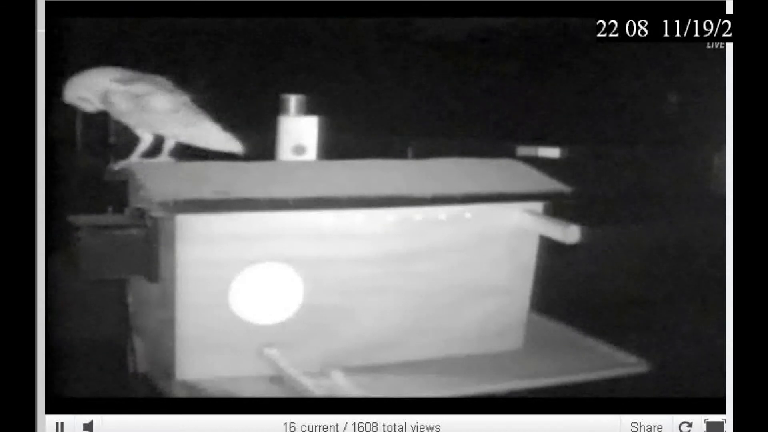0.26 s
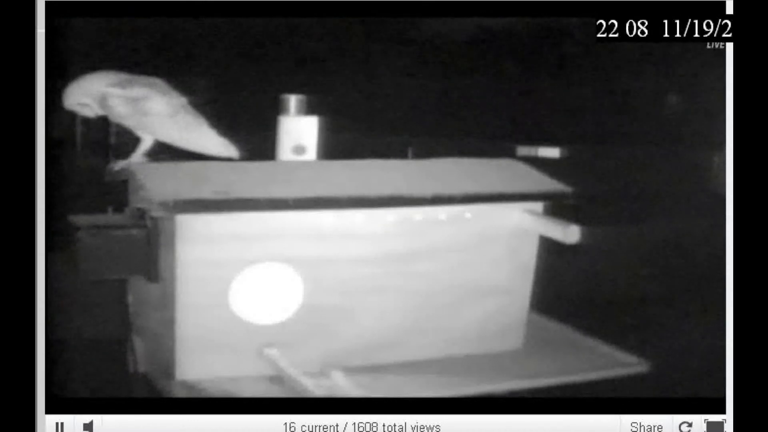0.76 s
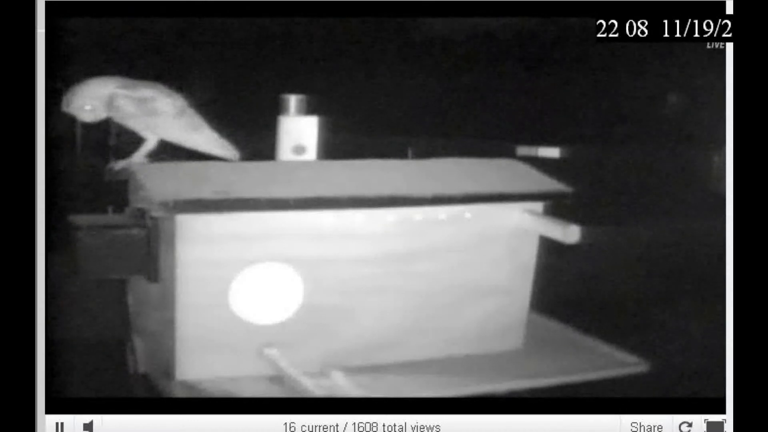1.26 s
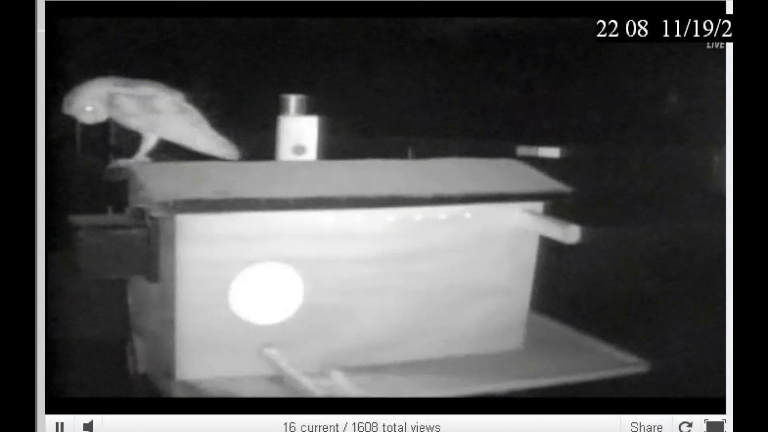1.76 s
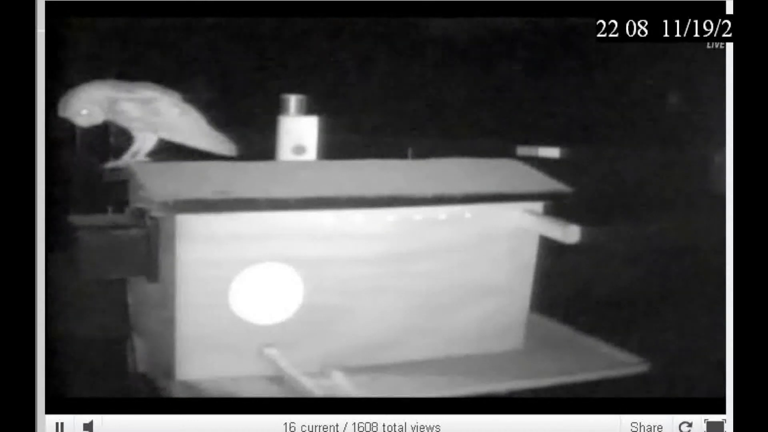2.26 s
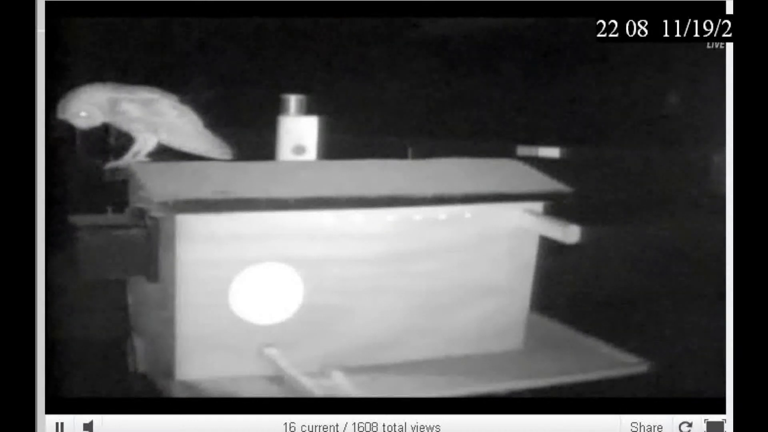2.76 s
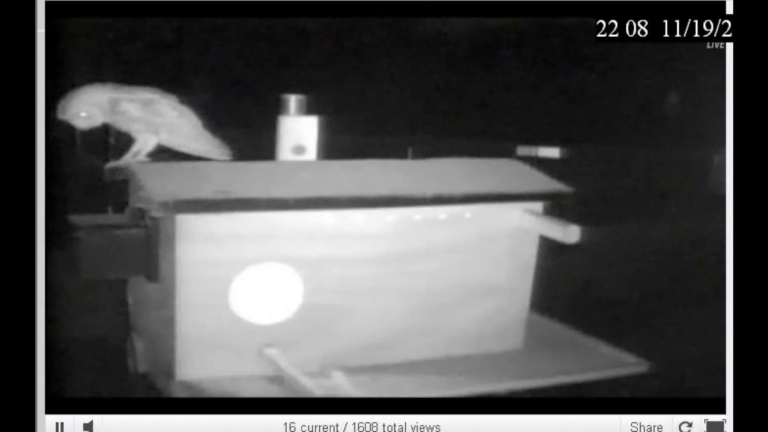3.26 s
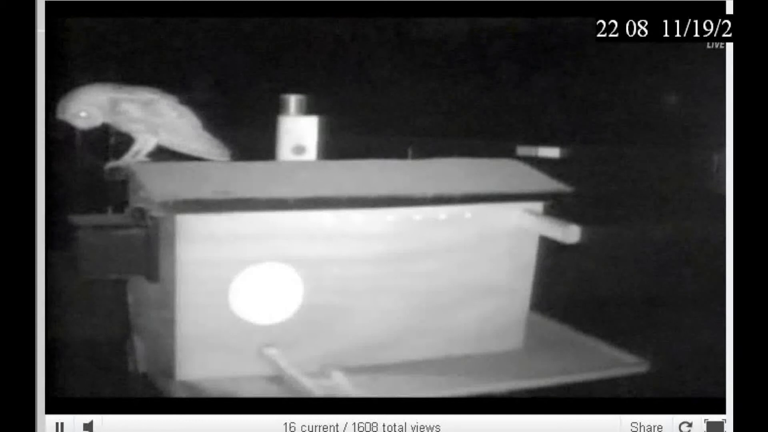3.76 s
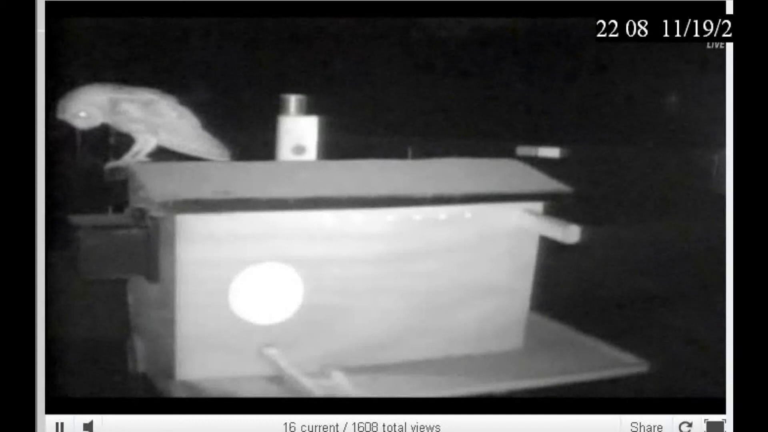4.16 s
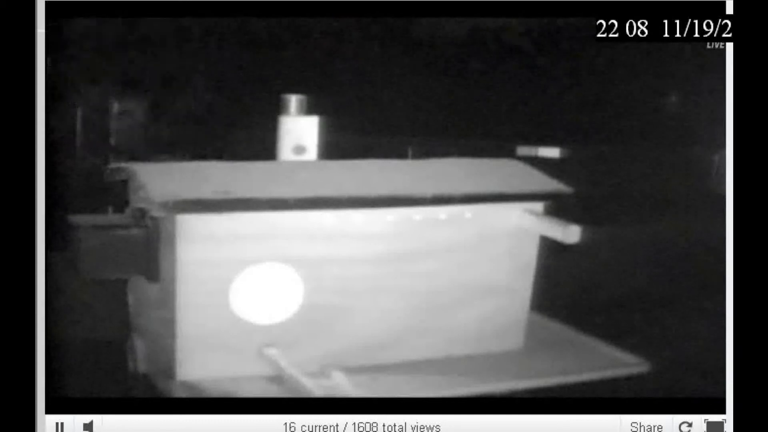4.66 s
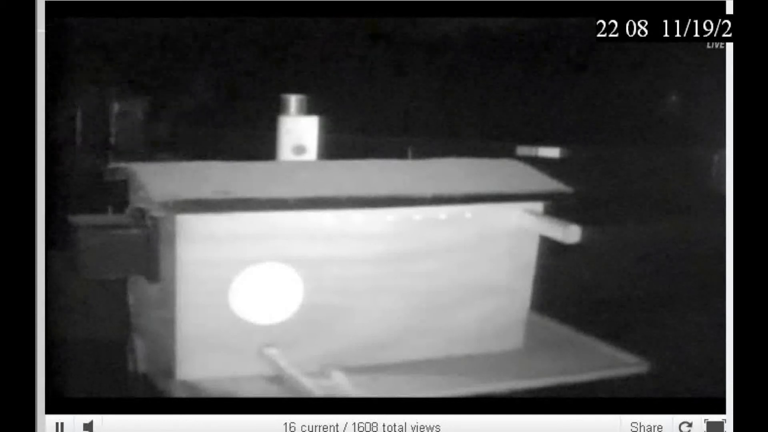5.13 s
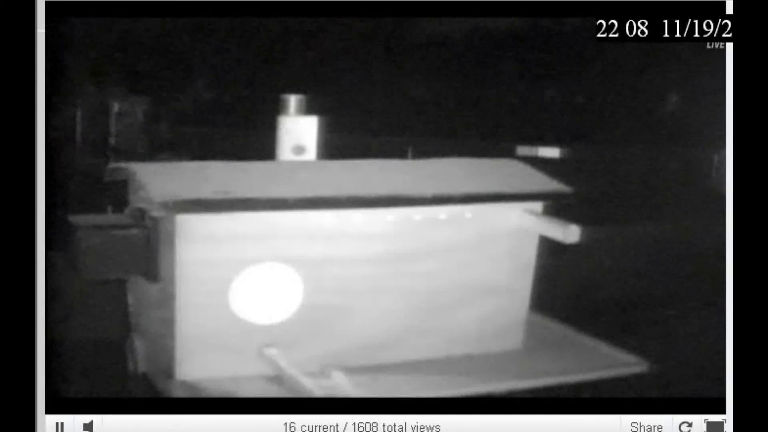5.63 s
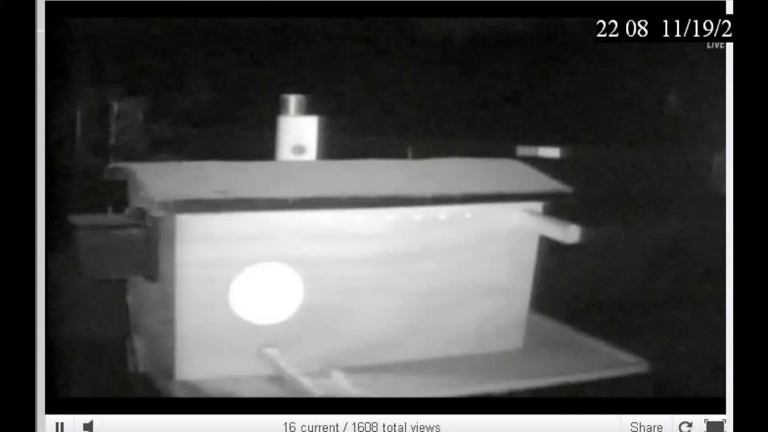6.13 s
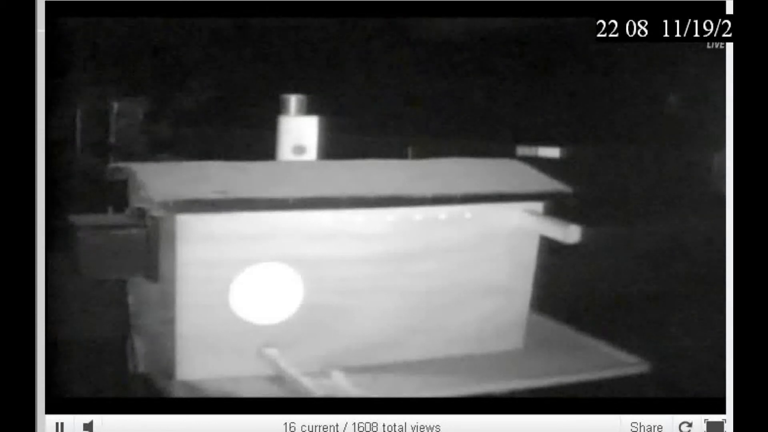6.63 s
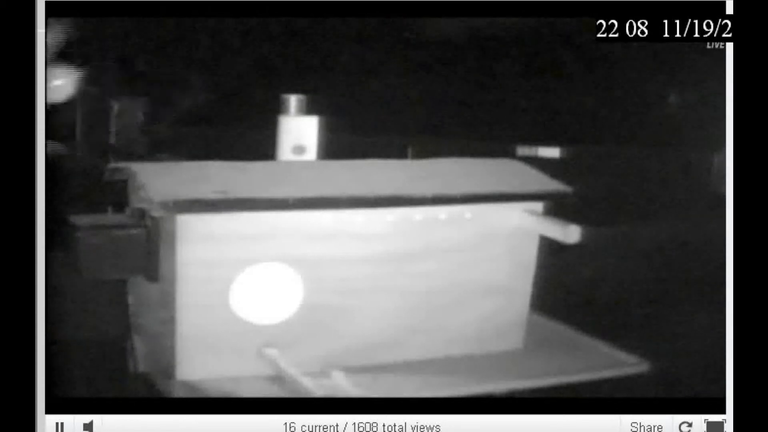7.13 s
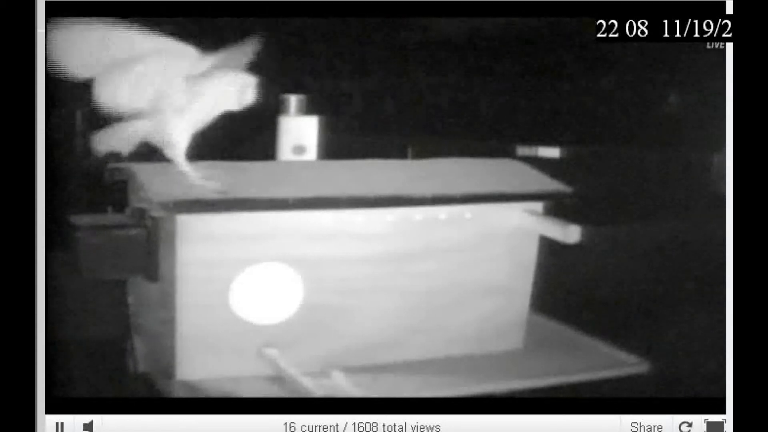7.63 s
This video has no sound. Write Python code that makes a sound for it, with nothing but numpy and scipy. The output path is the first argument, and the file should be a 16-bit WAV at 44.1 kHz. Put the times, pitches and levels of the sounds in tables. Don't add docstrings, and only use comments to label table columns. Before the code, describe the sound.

Close inside a hollow wooden nest box at night, low air rumble and faint hiss surround an owl's claws ticking, slipping and scraping on the roof overhead. Dull footfalls ring the walls. Midway, two heavy slams boom and crackle with harsh overload, followed by small rebounds. Sparse scratches continue, then one firm knock with a woody tick before the box settles into quiet rumble.

```python
import sys
import numpy as np
from scipy import signal
from scipy.io import wavfile
from scipy.ndimage import uniform_filter1d

SR = 44100
rng = np.random.default_rng(int(sys.argv[2]) if len(sys.argv) > 2 else 0)


def to_wav(sig):
    pcm = np.clip(np.atleast_2d(sig), -1, 1) * 32767
    pcm = np.round(pcm).astype(np.int16)
    wavfile.write(sys.argv[1], SR, pcm.T)


def volts_from_db(level):
    exponent = np.asarray(level, float) / 20
    return 10 ** exponent


N = 347949
TIME = np.arange(N) / SR


def unit(x):
    return x / np.sqrt(np.mean(x ** 2))


def band(x, lo_hz, hi_hz, order=2):
    return signal.sosfilt(signal.butter(order, [lo_hz, hi_hz], "band", fs=SR, output="sos"), x)


def resonate(x, peaks):
    out = 0
    for k, (hz, width, db) in enumerate(peaks):
        b, a = signal.iirpeak(hz, hz / max(width, 5.0), SR)
        out = out + (-1) ** k * volts_from_db(db) * signal.lfilter(b, a, x)
    return out


def walk(rate_hz):
    k = int(SR / rate_hz)
    steps = np.repeat(rng.standard_normal(N // k + 1), k)
    return 1.1 * uniform_filter1d(uniform_filter1d(steps, k), k)[:N]


def swell(t, rise_s):
    return np.sin(np.pi / 2 * np.clip(t / rise_s, 0, 1)) ** 2


def add(out, s, x):
    i = int(s * SR)
    out[i:i + len(x)] += x[:N - i]


def hollow(peaks):
    out = np.zeros(N)
    for hz, width, db in peaks:
        once = resonate(rng.standard_normal(N), [(hz, 1.6 * width, db)])
        twice = resonate(once, [(hz, 1.6 * width, 0)])
        out += volts_from_db(2.0 * walk(6.9)) * twice / np.sqrt(width)
    return unit(out)


# time in seconds, level in dB.
CALMING = [(0, -1.5), (1.4, 1.5), (2.1, 0.36), (3.4, 1.5), (4.1, 0.1), (4.55, -3.5), (5.84, -4.5),
           (6.66, -7), (7.89, -6.5)]
# pitch in Hz, width in Hz, level in dB.
RUMBLE_MODES = [(82, 30, -3), (121, 9.3, -2.5)]
# pitch in Hz, width in Hz, level in dB.
BOOM_MODES = [(181.5, 5.6, -4.5), (219.3, 59, 1), (330.5, 33, -13), (364, 46, -6), (502, 30, -18)]
# pitch in Hz, width in Hz, level in dB.
MIDDLE_MODES = [(742, 25, 4.5), (881, 15, 4), (1050, 30, -1), (1162, 4.9, 2.5), (1410, 40, -11.5),
                (936.6, 2500, -15.5)]
# level in dB, share of the calming (no unit), shudder after a knock in dB.
AIR_LAYERS = [
    (-56.5, 1, -26.5),
    (-52.5, 1, -34.5),
    (-67.5, 0.83, -56.5),
    (-68, .9, -70.5),
]


def night(box):
    shudder_s = 0.12
    calm_db = np.interp(TIME, *np.transpose(CALMING))
    keep = np.exp(-1 / (shudder_s * SR))
    shudder = signal.lfilter([1 - keep], [1, -keep], np.abs(box))
    rumble, boom, middle, upper = (volts_from_db(db + share * calm_db) + volts_from_db(shudder_db) * shudder
                                   for db, share, shudder_db in AIR_LAYERS)
    air = rng.standard_normal((2, N))
    out = rumble * hollow(RUMBLE_MODES) + boom * hollow(BOOM_MODES)
    out += middle * volts_from_db(2.0 * walk(4.1)) * unit(resonate(air[0], MIDDLE_MODES))
    out += upper * unit(band(air[1], 500, 1500, order=1))
    whistle = volts_from_db(-84 + 1.0 * walk(20)) * np.sin(2 * np.pi * 5858 * TIME)
    return out + whistle


# start in seconds, level in dB.
POST_LURCHES = [
    (3.432, -24),
    (3.772, -19),
]


def lurches():
    swing_s = 0.024
    out, t = np.zeros(N), TIME[:int(swing_s * SR)]
    for s, db in POST_LURCHES:
        add(out, s, volts_from_db(db) * np.sin(np.pi * t / swing_s) ** 2)
    return out


# pitch in Hz, width in Hz, level in dB.
BOARD_MODES = [(678, 26, 2.5), (870, 13, 5.5), (1140, 36, -13), (1430, 50, 5), (1940, 26, -3),
               (2205, 64, 0.5), (2730, 13, -6), (3060, 16, -12.5), (3090, 28, -8), (3700, 30, -5.5),
               (3480, 35, -11.5), (4263, 78, -11.5), (5190, 180, -9.5), (5500, 16, -13)]


def slide(out, slips, s, middle_db, low_db, high_db, length_s, bright_hz):
    t = TIME[:int(4 * max(length_s, 0.01) * SR)]
    slip = unit(slips[int(s * SR):][:len(t)])
    peaks = [(hz, width, db + 2.0 * rng.standard_normal()) for hz, width, db in BOARD_MODES]
    wood = resonate(slip, peaks) + volts_from_db(-13) * slip
    bright_db = np.interp(bright_hz, [1300, 6000], [2.5, -5])
    wood = wood + resonate(slip, [(bright_hz, 0.06 * bright_hz, bright_db)])
    part = t / t[-1]
    fade = np.exp(-(part / 0.21) ** 1.4)
    low = volts_from_db(low_db) * unit(band(wood, 320, 1400)) * fade ** 1.3
    middle = volts_from_db(middle_db - 11.5) * unit(band(wood, 850, 2700)) * fade
    high = volts_from_db(high_db) * unit(band(wood, 3300, 7000)) * fade ** 1.3 * np.clip(part / 0.11, 0, 1)
    add(out, s - 0.007, (low - middle + high) * swell(part, 0.14))


# start in seconds, middle, low and high level in dB, brightest pitch in Hz.
TALON_TICKS = [(0.8505, -53, -71, -70, 1410), (0.9867, -37.5, -75, -63, 1450),
               (1.0245, -40.5, -60, -62, 3000), (1.083, -70, -51, -70, 1430), (1.1934, -70, -62, -73, 1410),
               (1.2554, -34, -44, -50.5, 1800), (1.3693, -45, -45.5, -55, 1900),
               (1.745, -34, -50, -50, 2000), (1.8377, -17, -41.5, -32, 1445),
               (2.2625, -34.5, -39, -60, 1420), (2.592, -33, -61, -49, 2100), (2.7696, -56, -59, -65, 1660),
               (2.9024, -64, -55, -42, 5500), (3.159, -53, -62, -64, 1410),
               (3.2594, -51.5, -70, -60.5, 1410), (3.3074, -42, -50, -44, 2180),
               (3.699, -49, -43.5, -61.5, 1415), (4.114, -34.5, -45, -41.5, 1940),
               (5.3787, -42, -66.5, -51.5, 3720), (6.2906, -23.5, -39, -38, 1430)]


def ticks(slips):
    out = np.zeros(N)
    for s, middle_db, low_db, high_db, hz in TALON_TICKS:
        slide(out, slips, s, middle_db, low_db, high_db, 0.028, hz)
    return out


# start in seconds, middle and high level in dB, length in seconds,
# brightest pitch in Hz.
TALON_DRAGS = [(0.9637, -57, -54.5, 0.029, 1410), (1.491, -48, -82.5, 0.033, 2150),
               (1.5192, -30.5, -45, 0.045, 2181), (1.5444, -43, -46.5, 0.035, 2036),
               (1.755, -46, -36, 0.037, 4497), (1.8502, -41, -39.5, 0.021, 1534),
               (1.8744, -49, -48, 0.035, 1341), (1.9155, -35, -35.5, 0.031, 2950),
               (2.2504, -32.5, -44, 0.047, 1898), (2.602, -28.5, -34.5, 0.03, 2141),
               (3.0744, -56, -41, 0.043, 5530), (3.1196, -51, -62, 0.028, 4900),
               (3.946, -44.5, -49, 0.03, 5900), (4.14, -46, -51, 0.043, 3520),
               (4.17, -48, -49, 0.0405, 2880), (4.2523, -43, -66, 0.04, 1890),
               (6.07, -43, -44.5, 0.0477, 5080), (6.109, -46.5, -78, 0.039, 1820),
               (6.256, -37.5, -49.5, 0.043, 1940), (6.3086, -20.5, -43.5, 0.027, 1430)]


def drags(slips):
    out = np.zeros(N)
    for s, middle_db, high_db, length_s, hz in TALON_DRAGS:
        slide(out, slips, s, middle_db, middle_db - 11, high_db, length_s, hz)
    return out


# start in seconds, pitch in Hz, level in dB, length in seconds.
CLAW_SQUEAKS = [(0.974, 1430, -55, 0.027), (1.066, 690, -55.5, 0.028), (1.186, 690, -57, .02),
                (1.55, 1160, -45, .012), (1.264, 716.8, -53, 0.033), (1.489, 2190, -59, 0.061),
                (1.5, 5270, -72, .06), (1.757, 4370, -38, 0.015), (2.257, 663, -44.5, 0.014),
                (2.257, 2120, -54, 0.04), (2.597, 870, -47.5, 0.038), (2.603, 5180, -47, 0.021),
                (4.113, 1890, -52.5, 0.019), (4.118, 716, -52, 0.07), (4.148, 2860, -55.5, 0.046),
                (4.15, 3570, -56.5, .04), (6.061, 2820, -53, 0.047), (6.071, 1750, -55, .045),
                (6.068, 5614, -58, .02), (3.8115, 1400, -38, .004), (6.063, 3635, -54, 0.036),
                (6.065, 4750, -51.5, 0.032), (6.364, 1400, -54.5, 0.035), (6.369, 602, -52.5, .03),
                (1.548, 780, -41, .016), (3.297, 876, -51.5, 0.04), (1.74, 870, -49, .025),
                (3.463, 1480, -49, .024), (3.8105, 715, -30, 0.006), (6.381, 4000, -74, 0.03)]


def squeaks(slips):
    out = np.zeros(N)
    for s, hz, db, length_s in CLAW_SQUEAKS:
        t = TIME[:int(1.6 * length_s * SR)]
        peak = [(hz, 70 + 0.03 * hz, 0)]
        ring = unit(resonate(resonate(slips[int(s * SR):][:len(t)], peak), peak))
        add(out, s, volts_from_db(db) * ring * np.sin(np.pi * (t / t[-1]) ** 0.6))
    return out


def scrapes():
    slips = rng.standard_normal(N) * volts_from_db(2.0 * rng.exponential(size=N)) * volts_from_db(1.5 * walk(150))
    return ticks(slips) + drags(slips) + squeaks(slips)


# pitch in Hz, level in dB, share of the ring time (no unit).
WALL_MODES = [(159.4, -5.5, 1.5), (182.3, -7, 1.1), (210.7, -0.5, 1.1), (226.5, -3, .9)]
# pitch in Hz, level in dB, share of the ring time (no unit).
CAVITY_MODES = [(115.16, 2, 1.9), (126.3, -10.5, 0.61)]
# pitch in Hz, level in dB, share of the ring time (no unit).
ROOF_MODES = [(266, -6, 1), (332, -0.5, 0.41), (375, -1.5, 0.89), (412, -1.5, 0.5), (524.9, -5.5, 0.29)]


def knock(out, s, walls_db, cavity_db, roof_db, t60_s, push_s):
    t = TIME[:SR // 2]
    ring = np.zeros(len(t))
    for group_db, modes in ((walls_db, WALL_MODES), (cavity_db, CAVITY_MODES), (roof_db, ROOF_MODES)):
        for hz, db, share in modes:
            weight, detune, phase = rng.standard_normal(3)
            level = volts_from_db(group_db + db - 5 + 2.0 * weight)
            decay = volts_from_db(-60 * t / (max(t60_s, 0.03) * share))
            ring += level * decay * np.sin(2 * np.pi * hz * (1 + 0.014 * detune) * t + 0.55 * phase)
    add(out, s, ring * swell(t, push_s))


SOFT_PUSH_S, SOFT_LEAD_S = 0.015, 0.0095

# time in seconds, walls and cavity level in dB.
POST_REBOUNDS = [(1.273, -20, -37), (1.589, -39, -44), (1.798, -35.5, -21.5), (1.845, -19.5, -32.5),
                 (1.889, -29, -29), (2.632, -16.5, -29.5), (2.874, -34.5, -35.5), (3.522, -12, -30),
                 (3.807, -3, -6), (3.862, -16, -27), (3.926, -21.5, -26.5), (3.974, -22.5, -22)]


def rebounds():
    out = np.zeros(N)
    for s, walls_db, cavity_db in POST_REBOUNDS:
        roof_db = (walls_db + cavity_db) / 2 - 17
        knock(out, s - SOFT_LEAD_S, walls_db, cavity_db, roof_db, 0.21, SOFT_PUSH_S)
    return out


# time in seconds, walls, cavity and roof level in dB.
FOOT_KNOCKS = [(0.651, -41, -50, -52), (1.103, -37, -44, -51), (1.236, -24, -34, -39.5),
               (1.522, -29.5, -46, -26.5), (1.55, -26, -40.5, -19), (1.743, -35, -39, -25.5),
               (1.764, -13, -19.5, -23), (2.265, -27.5, -28.5, -31), (2.317, -37, -45, -44.5),
               (2.592, -15.5, -35, -32), (2.823, -26, -35.5, -46), (3.126, -38, -55, -49.5),
               (3.297, -47, -41.5, -45), (3.702, -36.5, -27.5, -33), (4.129, -62, -61, -37),
               (4.367, -41, -42, -64), (5.019, -36, -66.5, -58), (5.443, -42, -63, -45),
               (6.083, -31.5, -56.5, -40.5), (6.142, -29.5, -40, -46), (6.232, -48.5, -34, -52),
               (6.298, -23, -24.5, -28), (6.315, -10.5, -19.5, -18), (6.367, -23, -23, -26.5),
               (6.417, -29, -40.5, -36), (7.482, -47, -71, -64)]


def footfalls():
    out = np.zeros(N)
    for s, walls_db, cavity_db, roof_db in FOOT_KNOCKS:
        knock(out, s - SOFT_LEAD_S, walls_db, cavity_db, roof_db, 0.18, SOFT_PUSH_S)
    return out


# start in seconds, walls, cavity and roof level in dB, ring t60 in seconds.
HEAVY_SLAMS = [
    (3.420, -12, -19.5, -18, 0.21),
    (3.430, 1, -15, -8, 0.14),
    (3.45, 2.5, -10.5, -16, 0.08),
    (3.474, -6, -9, -25, .08),
    (3.758, -16.5, -17, -16.5, 0.048),
    (3.765, 3, -8.5, -15, .17),
    (3.782, -6, -5, -6.5, .12),
]


def slams():
    out = np.zeros(N)
    for row in HEAVY_SLAMS:
        knock(out, *row, push_s=0.0055)
    return out


def scene():
    box = rebounds() + footfalls() + slams()
    box = box + lurches() + scrapes() + night(box)
    return np.array([box, box])


# start in seconds, length in ms, jump in full scale.
CONVERTER_OVERFLOWS = [(3.4318, .8, .85), (3.4344, .2, .6), (3.4375, .8, 1.2), (3.4386, .4, .6),
                       (3.4393, .9, 1.4), (3.4413, .4, 1), (3.4446, .4, 1), (3.4469, .4, .9),
                       (3.4519, .7, 1.05), (3.4577, .6, .6), (3.7670, .5, .7), (3.7729, .4, 1.3),
                       (3.7832, .15, .7), (3.7861, .3, .8), (3.7890, .25, .7), (3.7918, .25, .6)]


def stream(x):
    full = 0.66
    jumps = np.zeros(N)
    for s, ms, jump in CONVERTER_OVERFLOWS:
        side = np.sign(x[int((s + ms / 2000) * SR)])
        jumps -= jump * side * ((TIME >= s) & (TIME < s + ms / 1000))
    x = full * np.tanh(x / full * 0.89)
    x = np.clip(x + 0.85 * jumps, -full, full)
    edges = np.abs(np.diff(jumps, prepend=0))
    spread = uniform_filter1d(uniform_filter1d(edges, size=900), size=500)
    x = x + volts_from_db(6.5) * spread * unit(band(rng.standard_normal(N), 300, 7500, order=1))
    x = x * (1 + volts_from_db(-49) * np.sin(2 * np.pi * 5750 * TIME))
    narrow = signal.sosfilt(signal.bessel(2, 9000, fs=SR, output="sos"), x)
    narrow = signal.sosfilt(signal.ellip(9, 0.1, 55, 6750, fs=SR, output="sos"), narrow)
    mirror = band(narrow * np.cos(2 * np.pi * 20500 * TIME), 13500, 14800)
    narrow = band(narrow, 12, 12000, order=1)
    return narrow + volts_from_db(-12) * mirror + volts_from_db(-37.0) * band(x, 6100, 14000)


def hunting(spells):
    locked_hz, locked_db, lock_s = 11, -71, 0.05
    rate_hz, level_db = np.full(N, float(locked_hz)), np.full(N, float(locked_db))
    for start, end, hz, db in spells:
        on = uniform_filter1d(1.0 * ((TIME >= start) & (TIME < end)), int(lock_s * SR))
        rate_hz += (hz - locked_hz) * on
        level_db += (db - locked_db) * on
    phase = 2 * np.pi * np.cumsum(rate_hz * (1 + 0.3 * walk(25))) / SR
    return volts_from_db(level_db + 3.0 * walk(20)) * np.sin(phase)


# start and end in seconds, rate in Hz, level in dB.
HUNTING_SPELLS = [
    [(-.1, 4.1, 27, -49.5), (5.375, 5.405, 9, -57), (5.65, 6.24, 19, -47), (6.4, 7.4, 16, -48),
     (7.45, 7.6, 12, -58), (7.63, 8, 15, -46)],
    [(-.1, 4.1, 23, -49), (6.11, 6.24, 19, -46), (6.4, 7.1, 17, -45), (7.36, 8, 14, -46)],
]
# time in seconds, jump in Hz, settling in seconds.
WHINE_JOLTS = [
    (0, -500, 5),
    (4.13, -800, .35),
    (5.375, 1300, .03),
    (5.405, -1200, .3),
    (7.36, -4500, .04),
    (7.42, -700, .5),
]


def card(x):
    hunt = np.array([hunting(spells) for spells in HUNTING_SPELLS])
    drift = volts_from_db(-71) * unit(band(rng.standard_normal((2, N)), 15, 50))
    sway = volts_from_db(-61) * np.sin(2 * np.pi * 11.7 * TIME)
    jolts_hz = sum(hz * (TIME >= s) * np.exp(-np.abs(TIME - s) / settle_s) for s, hz, settle_s in WHINE_JOLTS)
    rest_hz = 12150 + uniform_filter1d(jolts_hz, size=900)
    whine_hz = rest_hz - 400000 * (hunt[0] + 0.5 * drift[0]) - 170000 * band(x, 20, 400)
    whine = volts_from_db(-76) * np.sin(2 * np.pi * np.cumsum(np.clip(whine_hz, 5000, 18000)) / SR)
    hiss = rng.standard_normal((3, N))
    hiss = volts_from_db(-73.5) * (hiss[:2] + 0.4 * hiss[2])
    click = -volts_from_db(-8.5 + np.array([[-8], [0]])) * (np.arange(N) == int(3.7832 * SR))
    return hunt + sway + drift + whine + hiss + click


def roll_off(x):
    return signal.sosfilt(signal.butter(12, 15000, fs=SR, output="sos"), x)


def record(dry):
    left_db, right_db = 0.5, 3.5
    x = stream(dry[0])
    both = volts_from_db(np.array([[left_db], [right_db]])) * x + card(x)
    return roll_off(np.clip(both, -1, 1))


dry = scene()
out = record(dry)
to_wav(out)
```